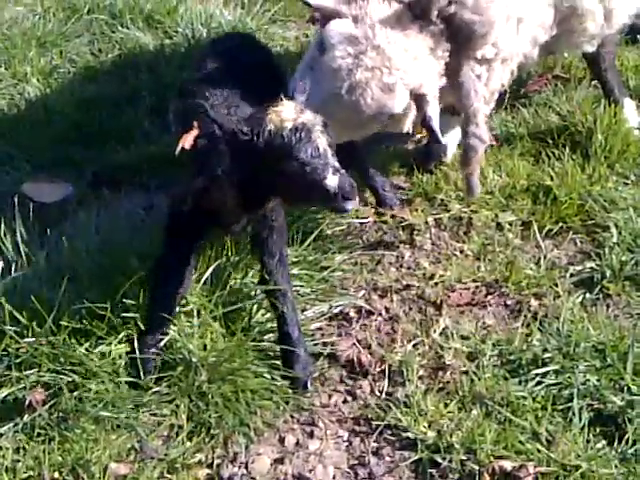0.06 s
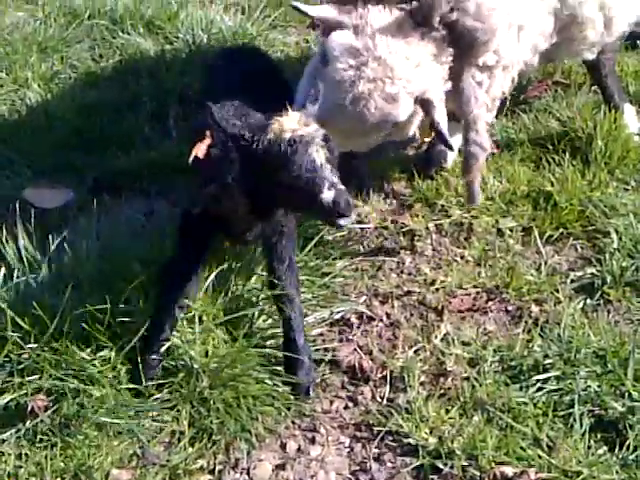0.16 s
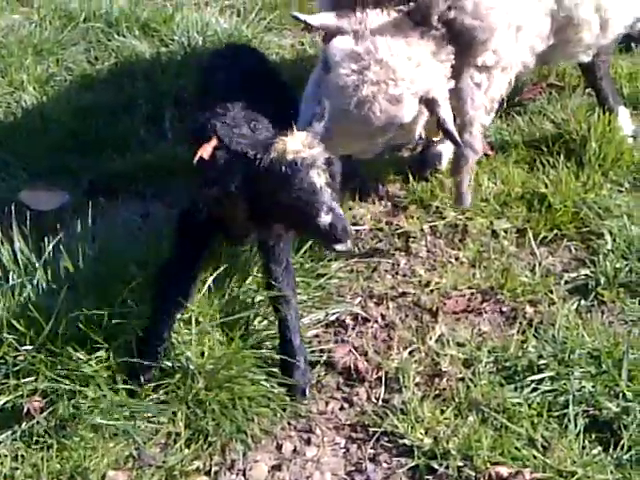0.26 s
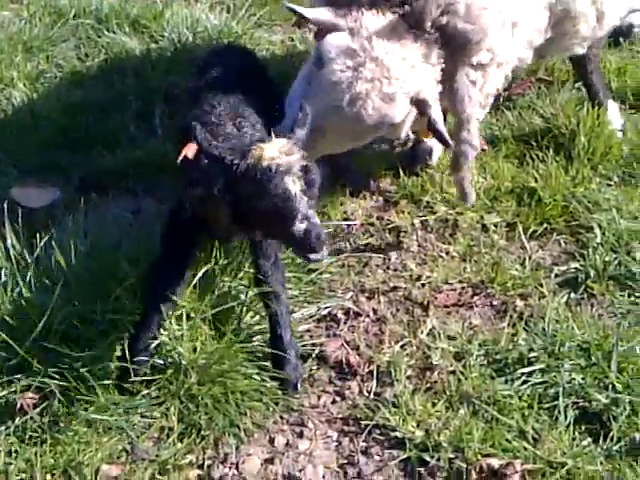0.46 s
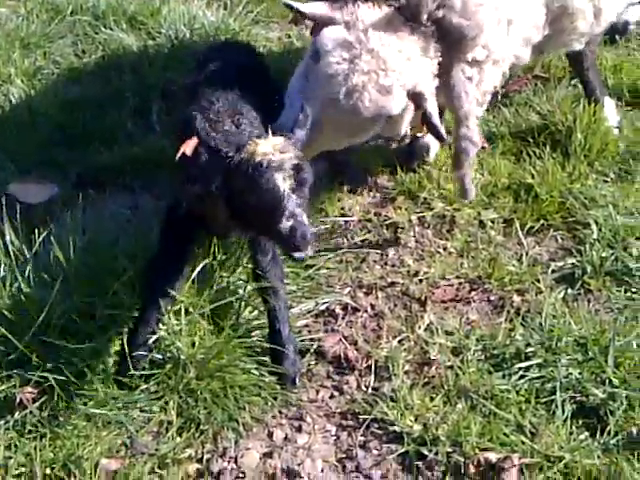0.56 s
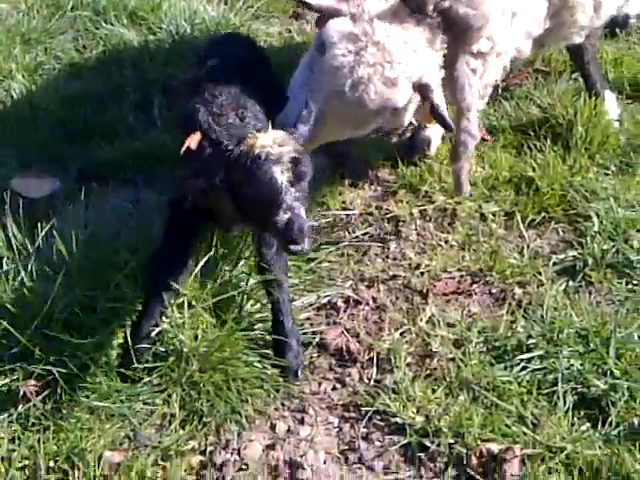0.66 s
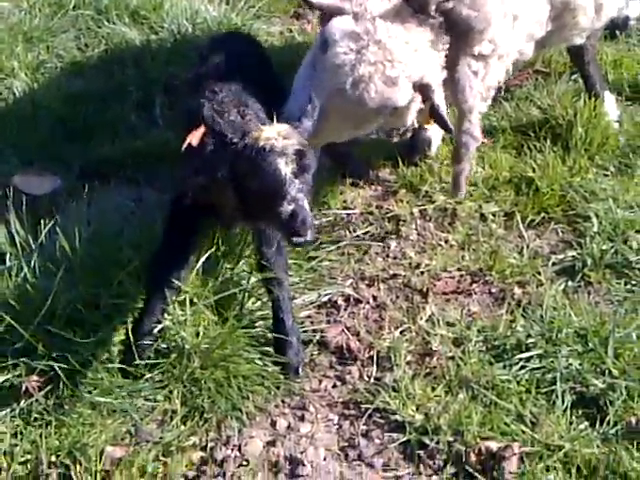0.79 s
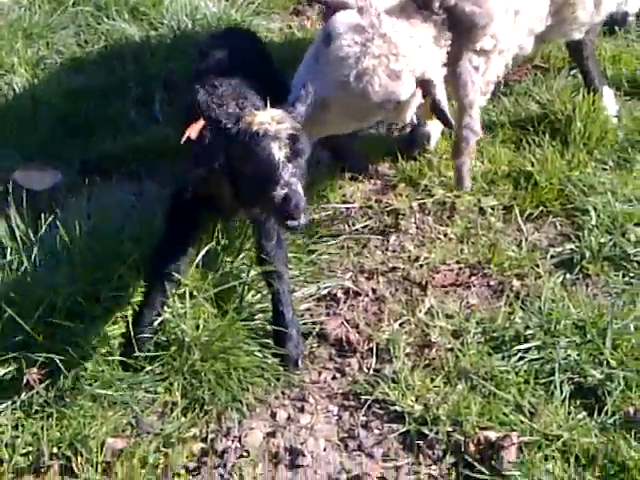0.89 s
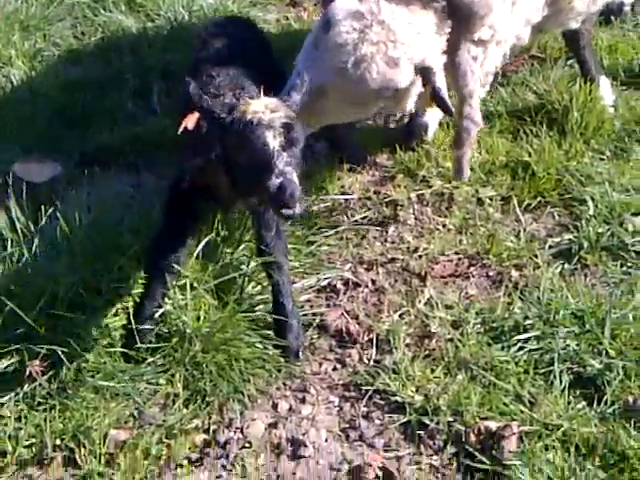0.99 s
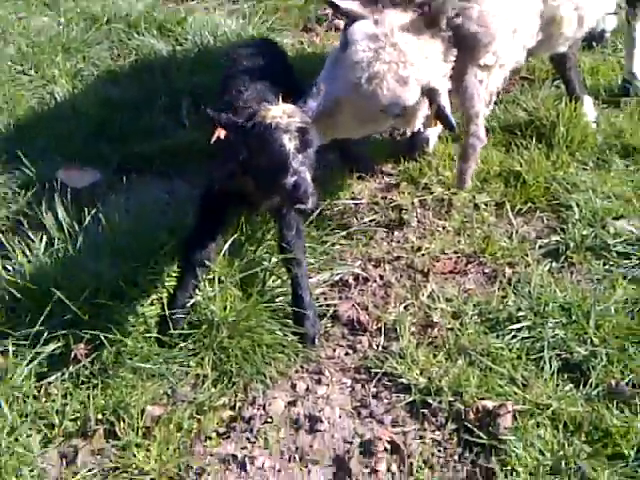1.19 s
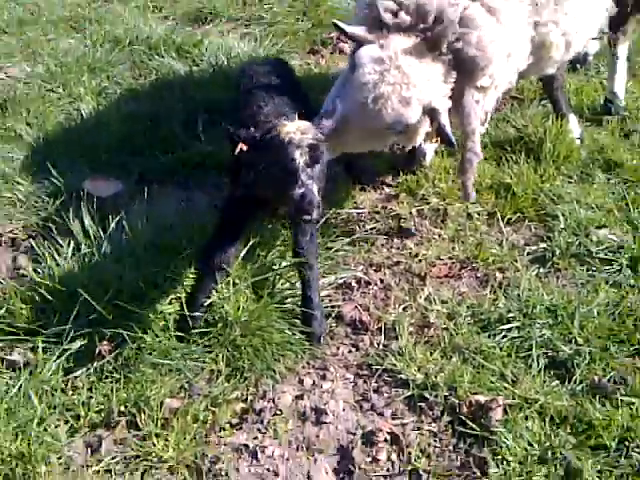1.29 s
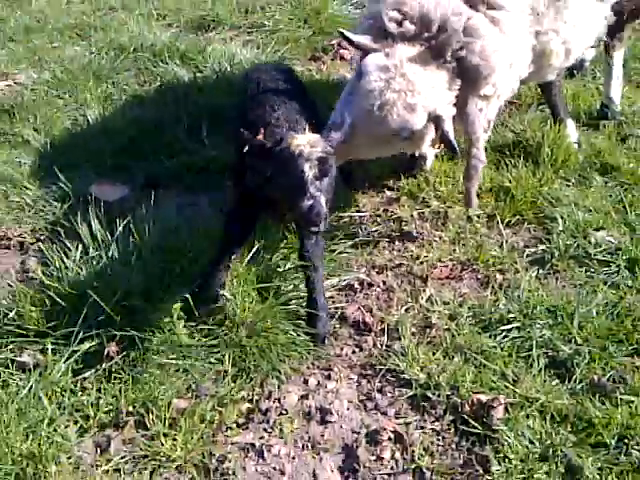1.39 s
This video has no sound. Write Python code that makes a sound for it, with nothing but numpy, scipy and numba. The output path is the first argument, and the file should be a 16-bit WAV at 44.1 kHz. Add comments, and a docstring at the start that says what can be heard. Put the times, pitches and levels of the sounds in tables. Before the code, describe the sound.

One stuttering lamb bleat in a quiet pasture, with soft grass rustling and far-off birds.

```python
"""On a pasture, a newborn lamb bleats once: six throbs that swell and run together, then a wavering held note.
The voice is a source and a filter: vocal-fold pulses ring a low cluster of throat resonances and a
bright, thin one near 5 kHz. Grass crunches in damped modes and rustles as bands of noise where the
sheep stand, and far birds whistle gliding tones over quiet open air."""
import sys
import numpy as np
from scipy import signal
from scipy.fft import rfft, irfft
from scipy.io import wavfile
from scipy.ndimage import uniform_filter1d
from numba import njit

SR = 44100
rng = np.random.default_rng(int(sys.argv[2]) if len(sys.argv) > 2 else 0)


def wav_out(sig):
    """Save sig, one row per channel (or a flat mono array), as 16-bit PCM at SR to the path in sys.argv[1]."""
    wavfile.write(sys.argv[1], SR, np.round(np.clip(np.atleast_2d(sig).T, -1, 1) * 32767).astype(np.int16))


N = 63945

# fundamental of the held note (time [s], pitch [Hz])
HELD_PITCH = [(.838, 296), (.847, 295), (.860, 345), (.874, 357), (.886, 396), (.908, 318), (.920, 335),
              (.936, 372), (.957, 342), (.970, 356), (.982, 339), (1.000, 344), (1.014, 360), (1.034, 334),
              (1.046, 327), (1.067, 300)]


def lamb():
    """Source-filter voice: pulses excite formants, whose tuning and balance glide through the held note."""
    # throat formants (first centre [Hz], last centre [Hz], width [Hz], first gain [dB], last gain [dB])
    throat_formants = [(375, 340, 94, -18, -11), (800, 800, 220, -8.5, 5), (1212, 1090, 210, -0.5, 0),
                       (1530, 1700, 585, -3.5, 0.5), (1966, 1910, 201, 2, 6)]
    # two bright resonances in series (ratio to the bright centre [1], width [Hz])
    bright_pair = [(0.974, 534), (1.04, 622)]
    # faint formants beside them (centre [Hz], width [Hz], first gain [dB], last gain [dB])
    upper_formants = [(4220, 570, -14, -3.5), (5800, 340, -26, -28.5), (6850, 1300, -10, -13.5)]
    pitch_hz, strength, bright_hz = vocal_effort()
    source = vocal_folds(pitch_hz, strength)
    held_start, held_end = HELD_PITCH[0][0], HELD_PITCH[-1][0]
    progress = np.clip((clock() - held_start) / (held_end - held_start), 0, 1) ** .5
    glide = lambda first, last: first + (last - first) * progress
    # alternating signs keep parallel formants from cancelling between their peaks
    throat = sum((-1) ** k * undb(glide(db0, db1)) * resonance(source, glide(hz0, hz1), width)
                 for k, (hz0, hz1, width, db0, db1) in enumerate(throat_formants))
    upper = sum((-1) ** k * undb(glide(db0, db1)) * resonance(source, hz, width)
                for k, (hz, width, db0, db1) in enumerate(upper_formants))
    bright = source * undb(glide(11, 10.5))
    for ratio, width in bright_pair:
        bright = resonance(bright, ratio * bright_hz, width)
    voice = butterworth(throat + bright - upper, order=2, hz=211, kind="high")
    return undb(-46) * unit(voice)


def vocal_effort():
    """Effort modulates the voice: each throb lifts pitch and strength and lowers the bright resonance."""
    # throbs (start [s], peak [s], stop [s], top pitch [Hz], half length [s], level [dB])
    throbs = [(.370, .398, .421, 275, .026, -9.5), (.451, .479, .505, 394, .031, -4.5),
              (.550, .574, .601, 393, .030, -2), (.625, .652, .700, 411, .036, -.5),
              (.699, .730, .775, 415, .041, -.3), (.765, .806, .880, 420, .050, -2.3)]
    # effort in the held note (time [s], level [dB], bright centre [Hz])
    held_effort = [(.84, -10.5, 5440), (.86, -3.5, 4780), (0.884, -6, 4590), (0.913, -6.5, 4900),
                   (.945, -6, 5010), (0.993, -8.5, 5160), (1.041, -7, 5210), (1.067, -14, 5310)]
    creak_hz, slack_hz, pushed_hz = 145., 5270, 4708  # pitch between throbs; range of the bright centre
    ramp_s, swell_share = .0056, .78
    t, pitch_hz, strength, push = clock(), np.full(N, creak_hz), np.zeros(N), np.zeros(N)
    for start, peak, stop, top_hz, half, db in throbs:
        away = np.abs(t - peak) / half
        swell = np.exp(-(away / .56) ** 2)
        voiced = np.clip(np.minimum(t - start, stop - t) / ramp_s + .5, 0, 1)
        pitch_hz = np.maximum(pitch_hz, top_hz * np.exp(-away ** 2.8))
        push = np.maximum(push, np.exp(-(away / .93) ** 2) * undb(db) ** .5)
        strength = np.maximum(strength, undb(db) * voiced * (1 - swell_share + swell_share * swell))
    bright_hz = slack_hz + (pushed_hz - slack_hz) * push
    held_s, held_hz = np.array(HELD_PITCH).T
    effort_s, held_db, held_bright_hz = np.array(held_effort).T
    release = np.clip(1 - (t - held_s[-1]) / ramp_s, 0, 1)
    held_strength = undb(np.interp(t, effort_s, held_db)) * release
    held = [np.interp(t, held_s, held_hz), held_strength, np.interp(t, effort_s, held_bright_hz)]
    return np.where(t < held_s[0], [pitch_hz, strength, bright_hz], held)


def vocal_folds(pitch_hz, strength):
    """Glottal source: one sharp pulse a cycle, with jitter and shimmer, each followed by decaying rasp."""
    jitter, shimmer_db, rasp_db, rasp_cycles = .006, .6, -34, .65
    cycles = np.cumsum(pitch_hz * (1 + jitter * wander(400))) / SR
    height = strength * undb(shimmer_db * wander(400))
    pulses, taps = np.zeros(N), np.arange(-8, 9)
    for i in np.flatnonzero(np.diff(np.floor(cycles[:-20]))):
        # a windowed sinc places the pulse between samples
        offset = taps - (np.ceil(cycles[i]) - cycles[i]) / (cycles[i + 1] - cycles[i])
        pulses[i + taps] += height[i] * np.sinc(offset) * np.sinc(offset / len(taps) * 2)
    rasp = np.exp(-(cycles % 1) / rasp_cycles) * rng.standard_normal(N)
    return pulses + undb(rasp_db) * strength * rasp


def grass_crunches():
    """Impulsive excitation: each crunch rings damped woody modes with a burst of grit and a low thud."""
    # crunches (time [s], level [dB], pitch [Hz], thud level [dB])
    crunches = [(.507, -44.5, 1460, -64), (.609, -49, 1670, -60.5), (.782, -37, 1234, -49),
                (.861, -34, 1320, -54), (.882, -38.5, 1350, -101), (.888, -37, 1280, -58),
                (.966, -36, 1395, -54), (1.013, -32.5, 1460, -53), (1.040, -32, 1280, -49.5),
                (1.045, -35.5, 1274, -48.5), (1.088, -41, 1350, -58), (1.094, -39.5, 1350, -84),
                (1.124, -46, 1230, -53.5), (1.143, -46, 1700, -54.5)]
    # modes of a crunch (ratio to the pitch [1], 60 dB decay time [s], level [dB])
    modes = [(0.998, 0.0097, 3), (1.419, 0.019, -13.5)]
    grit = noise_band(hz=1574, width=3900)
    snaps, thuds = np.zeros(N), np.zeros(N)
    for start, db, hz, thud_db in crunches:
        snap = sum(undb(mode_db) * damped_mode(start, hz * ratio, t60) for ratio, t60, mode_db in modes)
        snaps += undb(db) * (snap + undb(-7.5) * grit * decay(start, t60=.015))
        thuds += undb(thud_db) * thud(start, hz=307, rise_s=.004)
    return butterworth(snaps, order=3, hz=[863, 3120]) + butterworth(thuds, order=3, hz=[152, 3120])


def hoof_steps():
    """Soft impacts: each hoof gives a low, heavily damped thud."""
    # steps (time [s], level [dB], pitch [Hz])
    steps = [(0.056, -47.5, 208), (.098, -43.5, 242)]
    thuds = sum(undb(db) * thud(start, hz, rise_s=.0014) for start, db, hz in steps)
    return butterworth(thuds, order=3, hz=[152, 3120])


def grass_rustles():
    """Friction noise: brushing blades give bands of hiss under Gaussian envelopes."""
    # brushes (peak time [s], half length [s], centre [Hz], width [Hz], level [dB])
    rustles = [(.044, 0.0079, 1720, 1400, -55), (0.062, 0.11, 4580, 1900, -59),
               (0.201, 0.0054, 5650, 3000, -53.5), (0.221, 0.0073, 4310, 370, -51),
               (0.234, 0.0023, 5400, 3000, -52), (0.268, 0.11, 4280, 2220, -59),
               (0.276, 0.0063, 1770, 1400, -56.5), (.42, 0.11, 3430, 920, -60.5),
               (0.503, 0.009, 2380, 2200, -54), (0.522, 0.018, 5530, 1200, -61),
               (1.138, 0.0075, 3760, 2480, -59.5), (1.18, 0.011, 600, 494, -60),
               (1.197, 0.001, 4540, 1800, -55.5), (1.421, 0.0016, 5800, 1500, -50.5)]
    return sum(undb(db) * np.exp(-.5 * ((clock() - peak) / half) ** 2) * noise_band(hz, width)
               for peak, half, hz, width, db in rustles)


def birds():
    """Modulated pure tones: each far whistle glides along a parabola as it wavers and flutters."""
    # whistles (start [s], length [s], first pitch [Hz], middle pitch [Hz], last pitch [Hz], level [dB])
    whistles = [(.048, 0.097, 3120, 2615, 1940, -56.5), (1.21, .125, 2270, 2170, 2160, -68),
                (1.267, 0.19, 3890, 4364, 4360, -63), (1.388, 0.0987, 7900, 7550, 7570, -53.5)]
    waver, flutter_db = .0048, 4.3
    song = np.zeros(N)
    for start, length, first_hz, middle_hz, last_hz, db in whistles:
        progress = np.clip((clock() - start) / length, 0, 1)
        parabola = np.polyfit([0, .5, 1], [first_hz, middle_hz, last_hz], 2)
        hz = np.polyval(parabola, progress) * (1 + waver * wander(450))
        envelope = undb(db + flutter_db * wander(70)) * np.sqrt(4 * progress * (1 - progress))
        song += envelope * np.sin(2 * np.pi * np.cumsum(hz) / SR)
    return song


def open_air():
    """Spectrally shaped noise: a quiet background whose level flickers a little."""
    # spectrum of the air (frequency [Hz], relative level [dB])
    spectrum = [(30, -16.5), (95, -23), (160, -12.5), (310, 0), (600, -3.5), (1200, -6.5), (2500, -8.5),
                (4500, -11), (7500, -9.5), (9000, -15)]
    level_db, flicker_db = -59, 1.46
    hz, db = np.array(spectrum).T
    bin_hz = np.maximum(np.fft.rfftfreq(N, 1 / SR), 1)
    gain = undb(np.interp(np.log(bin_hz), np.log(hz), db))
    noise = irfft(rfft(rng.standard_normal(N)) * gain, N)
    return unit(noise) * undb(level_db + flicker_db * wander(25))


def thud(start, hz, rise_s):
    """Damped transient: a low tone that swells and dies in a few cycles."""
    age = np.maximum(clock() - start, 0)
    return age / rise_s * np.exp(1 - age / rise_s) * np.sin(2 * np.pi * hz * age)


def damped_mode(start, hz, t60):
    """Free vibration of one struck mode."""
    return decay(start, t60) * np.sin(2 * np.pi * hz * (clock() - start))


def decay(start, t60):
    """Exponential decay from a start time, by 60 dB in t60 seconds."""
    age = clock() - start
    return (age >= 0) * np.exp(-np.log(1000) * np.maximum(age, 0) / t60)


@njit
def state_variable_filter(x, hz, width):
    """Two integrators in a loop form a tunable band-pass with gain 1 at its centre."""
    y, band_state, low_state = np.empty(len(x)), 0., 0.
    for i in range(len(x)):
        g, damping = np.tan(np.pi * hz[i] / SR), width / hz[i]
        band = (band_state + g * (x[i] + 1e-18 - low_state)) / (1 + g * (g + damping))
        band_state = 2 * band - band_state
        low_state += 2 * g * band
        y[i] = damping * band
    return y


def resonance(x, hz, width):
    """Forced response of one resonator, steady or moving; width in Hz."""
    return state_variable_filter(x, hz * np.ones(N), float(width))


def noise_band(hz, width):
    """White noise through two resonators in series, rms 1."""
    return unit(resonance(resonance(rng.standard_normal(N), hz, width), hz, width))


def butterworth(x, order, hz, kind="band"):
    """Filter with a maximally flat passband."""
    return signal.sosfilt(signal.butter(order, hz, kind, fs=SR, output="sos"), x)


def wander(rate_hz):
    """Smooth random fluctuation, rms 1."""
    hold = int(SR / rate_hz)
    stairs = np.repeat(rng.standard_normal(N // hold + 1), hold)
    return unit(uniform_filter1d(stairs, hold)[:N])


def undb(db):
    """Decibels to amplitude gain."""
    return 10 ** (np.asarray(db) / 20)


def unit(x):
    """Scale to rms 1."""
    return x / np.sqrt(np.mean(x ** 2))


def clock():
    """Time of every sample in seconds."""
    return np.arange(N) / SR


def scene():
    """Superposition: lamb, grass, hooves, birds and air add at one point."""
    return (lamb() + grass_crunches() + hoof_steps() + grass_rustles() + birds() + open_air())[None]


def record(dry):
    """Spectral imaging: a soft low-pass lets a faint mirror image through just above half a low sample rate."""
    rate_hz, soft_top_hz, top_hz = 16000, 7220, 8700
    steep_lowpass = lambda x, hz: signal.sosfilt(signal.ellip(10, .2, 80, hz, fs=SR, output="sos"), x)
    limited = steep_lowpass(dry, rate_hz / 2 - 130)
    mirrored = limited * (1 + 2 * np.cos(2 * np.pi * rate_hz * clock()))
    softened = butterworth(mirrored, order=10, hz=soft_top_hz, kind="low")
    return steep_lowpass(softened, top_hz)


dry = scene()
out = record(dry)
wav_out(out)
```